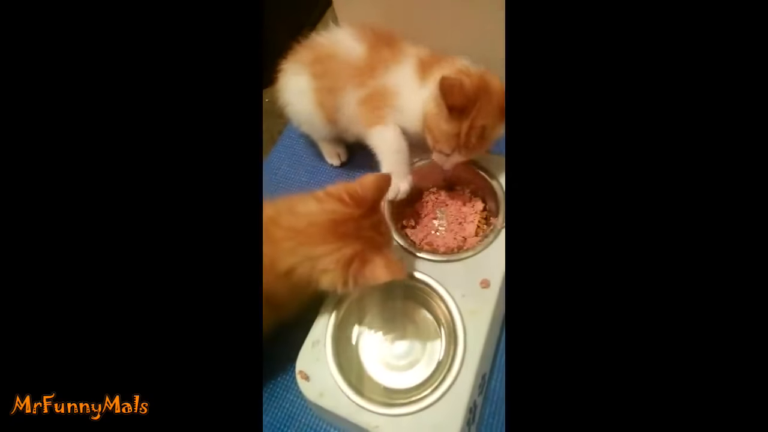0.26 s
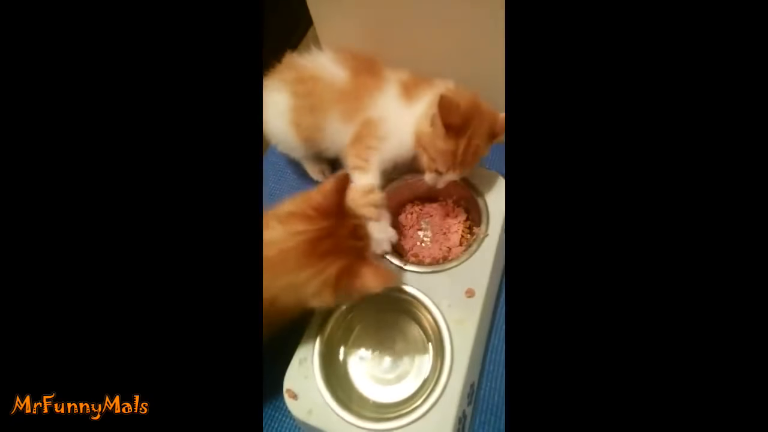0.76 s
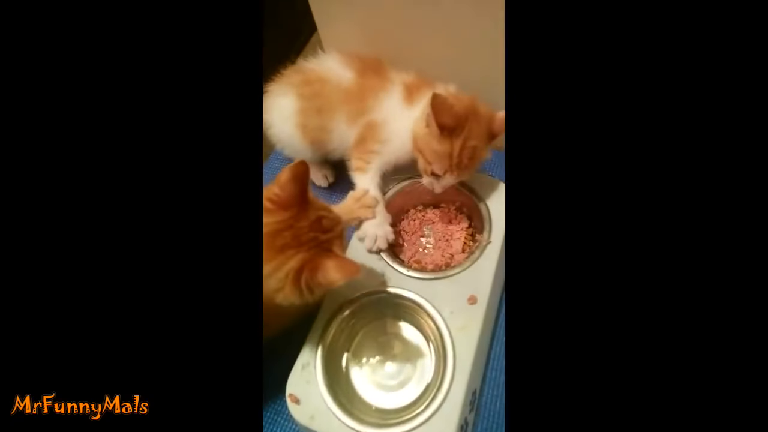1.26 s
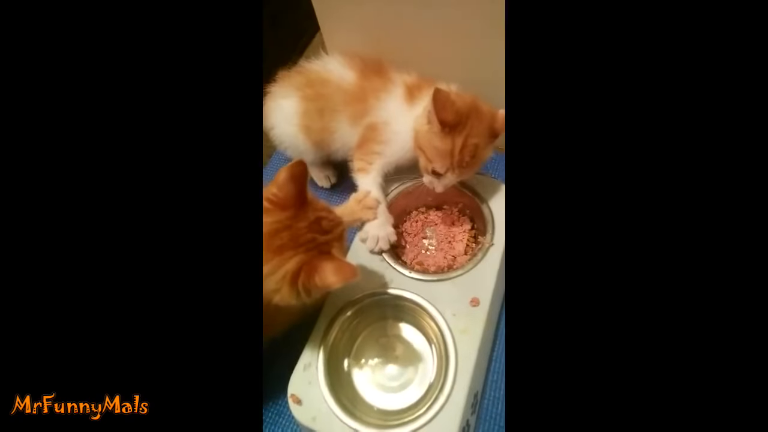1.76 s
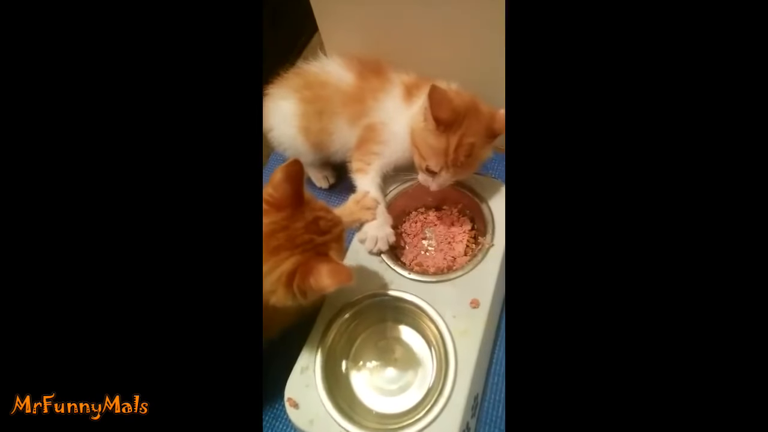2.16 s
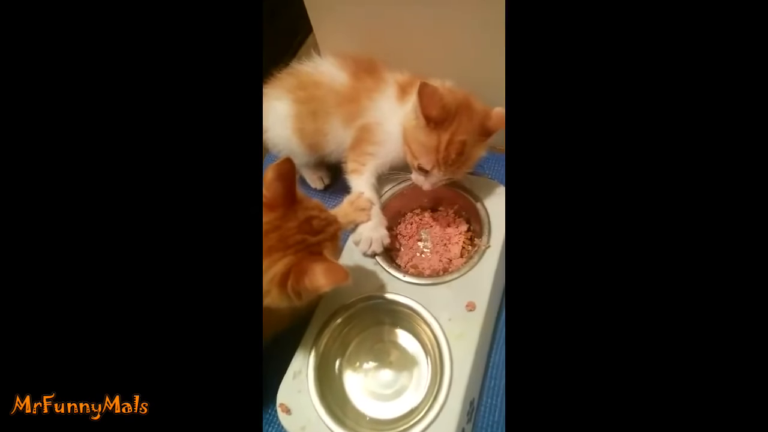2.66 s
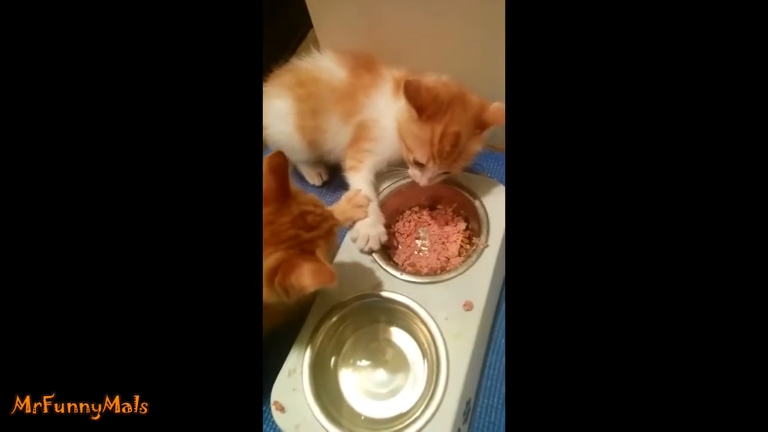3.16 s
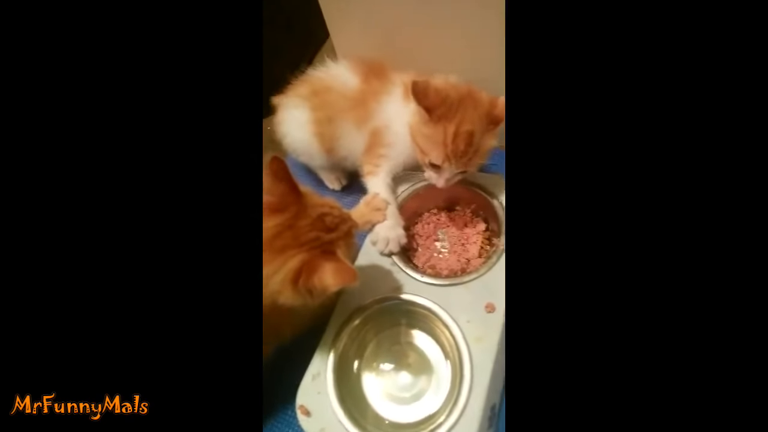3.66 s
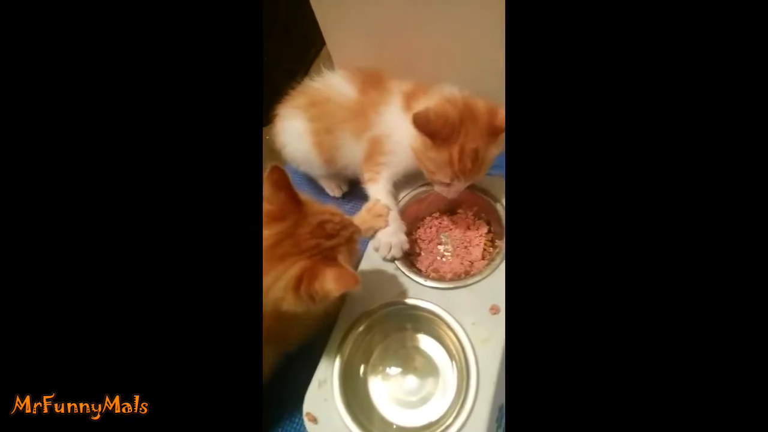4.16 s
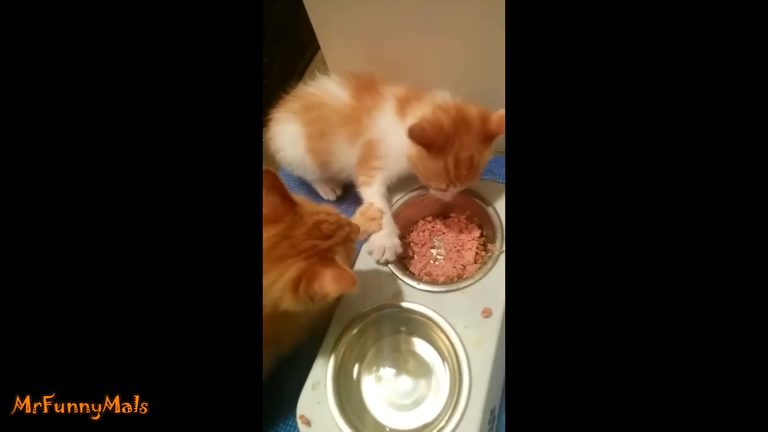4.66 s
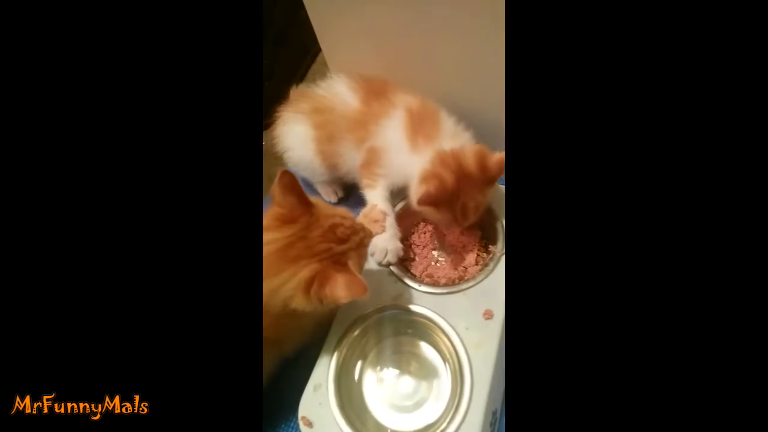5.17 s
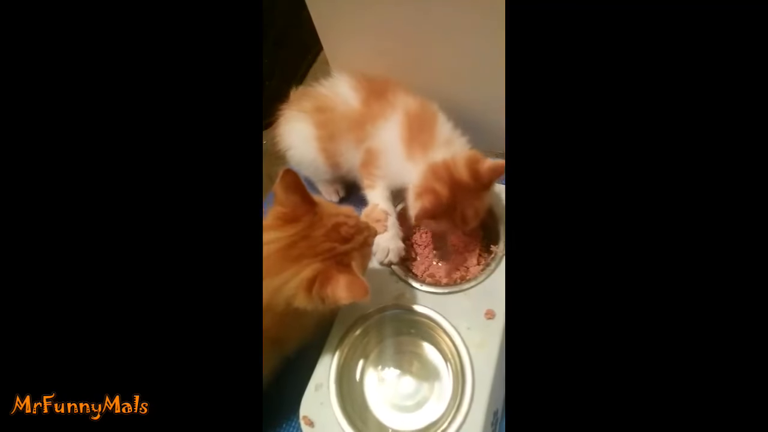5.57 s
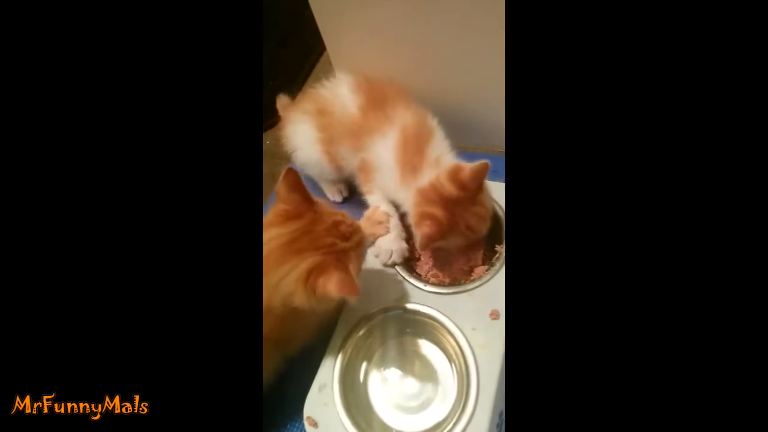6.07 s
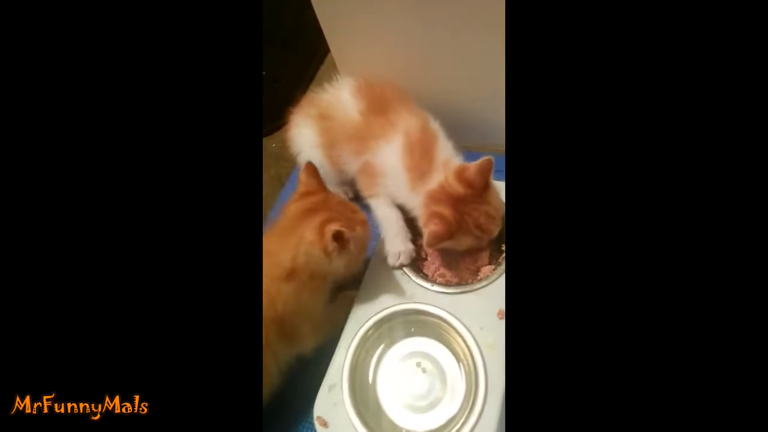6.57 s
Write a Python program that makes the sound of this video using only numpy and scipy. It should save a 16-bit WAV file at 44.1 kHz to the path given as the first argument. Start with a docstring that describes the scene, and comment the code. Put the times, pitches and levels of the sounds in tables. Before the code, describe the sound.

A small furnished room, close phone sound, with a faint low hum and uneven soft rustle of paws on a mat. A kitten's clear, high mew is already sounding and stops by 0.25 s; soft knocks and smacks at the bowl follow until 0.4. At 0.6 a rough yowl leaps upward with a dull thump and a spitty hiss, loud and open-mouthed, a thin whistle riding over it. It slides slowly down, dropping abruptly near 1.95 into a muffled moan lasting to 2.9. From 2.0 a second kitten moans lower, beating against it, and breaks into a growl by 3.25. Only faint knocks fill the gap until 4.0. Then the first growls, climbing to a strained, raspy wail around 5.0 to 5.8; the second snarls at 4.5 and wails until 5.2. The wail cracks and sinks by 6.05. Faint taps, then a wavering whine from 6.4 to 6.8.

```python
"""Two kittens quarrel over a food bowl in a small room; knocks and smacks come and go over rustling and a low hum.
One mews, then yowls with a thin whistle on top and sinks to a moan, while a second voice begins a moan of its own.
After a gap with only faint knocks the first growls its way up into a wail, against a snarl and a wail from
the second, and ends on a whine. Voices are stacks of unsteady harmonics shaped by an opening mouth, plus noisy
breath; knocks are short bursts of noise that ring a damped resonance; the background is shaped noise and sines."""
import sys
import numpy as np
from scipy import signal
from scipy.fft import rfft, irfft, next_fast_len
from scipy.io import wavfile

SR = 44100
rng = np.random.default_rng(int(sys.argv[2]) if len(sys.argv) > 2 else 0)


def wav_record(signal):
    """Record a signal, one row per channel, as 16-bit PCM in the file named by sys.argv[1]."""
    frames = np.transpose(np.atleast_2d(signal))
    bounded = np.clip(frames, -1, 1)
    # unit amplitude maps onto the largest positive 16-bit level
    quanta = np.round(bounded * 32767).astype(np.int16)
    wavfile.write(sys.argv[1], SR, quanta)


N = 300321
TIME = np.arange(N) / SR  # s
TOP_HZ = 15700  # nothing much is left above this

# The long yowl and the later wail, point by point, each before its gain and wavering:
# (t/s, pitch f/Hz, level/dB, mouth opening 0-1, roughness 0-1)
YOWL = [(0.592, 279, -33.5, 0.14, 0.52), (0.62, 485, -24.5, 0.11, 0.7), (0.642, 546, -19, 0.35, 0.96),
        (0.653, 548.4, -12, 0.5, 0.7), (0.68, 768, -16.5, 0.87, 0.63), (0.736, 1006, -9.5, 0.94, 0.52),
        (0.765, 1062, -12, 1.0, 0.23), (0.83, 1055, -14, 1.0, 0.23), (0.9, 1033, -14, 0.87, 0.04),
        (0.992, 1072, -15, 0.9, 0.054), (1.03, 1053, -12.5, 0.88, 0.043), (1.088, 1028, -15, 0.85, 0.05),
        (1.115, 997, -19, 0.91, 0.07), (1.17, 1002, -20, 0.81, 0.13), (1.28, 978, -19, 0.78, 0.098),
        (1.42, 948.4, -18.5, 0.74, 0.07), (1.46, 982, -19, 0.83, 0.2), (1.52, 958, -15, 0.71, 0.04),
        (1.6, 949.4, -16.5, 0.74, 0.065), (1.83, 908, -15, 0.72, 0.053), (1.89, 884, -16, 0.7, 0.091),
        (1.93, 828.6, -11.5, 0.646, 0.13), (1.955, 822, -28.5, 0.52, 0.27), (2.03, 774, -26, 0.45, 0.09),
        (2.1, 667.6, -29.5, 0.43, 0.12), (2.18, 625.6, -23.5, 0.38, 0.061), (2.4, 604, -22.5, 0.32, 0.07),
        (2.435, 539.6, -17, 0.24, 0.083), (2.58, 523.2, -14.5, 0.21, 0.057), (2.78, 576.2, -23, 0.31, 0.32),
        (2.845, 538, -25.5, 0.31, 0.25), (2.88, 486, -32, 0.43, 0.29)]
WAIL = [(4.015, 200.6, -54, 0.13, 0.4), (4.04, 202.2, -40.5, 0.14, 0.64), (4.17, 210.8, -31.5, 0.094, 0.25),
        (4.24, 252.6, -35.5, 0.18, 0.7), (4.33, 296.8, -36, 0.18, 0.7), (4.365, 398.4, -29.5, 0.2, 0.45),
        (4.44, 457, -34.5, 0.33, 0.41), (4.495, 394.4, -30.5, 0.38, 0.61), (4.61, 446, -37, 0.54, 0.5),
        (4.66, 445.3, -35.5, 0.4, 0.19), (4.745, 432, -23.5, 0.37, 0.11), (4.8, 402, -26.5, 0.38, 0.19),
        (4.86, 429, -30, 0.37, 0.56), (4.97, 572.4, -26.5, 0.65, 0.13), (5.11, 548.6, -20, 0.74, 0.09),
        (5.17, 536, -25, 0.73, 0.12), (5.27, 574.7, -23.5, 0.71, 0.12), (5.38, 586, -24.5, 0.76, 0.13),
        (5.46, 564.6, -17.5, 0.75, 0.15), (5.523, 544, -16.5, 0.764, 0.094),
        (5.531, 491, -14.5, 0.67, 0.17), (5.59, 499.3, -21, 0.68, 0.14), (5.7, 532.2, -22.5, 0.68, 0.15),
        (5.765, 515.7, -19, 0.71, 0.051), (5.81, 415, -21.5, 0.57, 0.734), (5.845, 421.4, -24.5, 0.5, 0.82),
        (5.9, 287.5, -23.5, 0.27, 0.37), (6.01, 324.6, -29.5, 0.031, 0.56), (6.042, 257.6, -33, 0.1, 0.64),
        (6.065, 265.7, -46.5, 0.046, 0.8)]
# Colour of a raspy throat, before scaling: (f/Hz, level/dB)
RASP = [(1500, -15), (3000, -4), (4200, -0.5), (4800, -10), (5500, -19.5), (6800, 5), (8400, -3.5),
        (9400, -15), (12000, -25.5), (16000, -47.5)]
# Colour of a thin, very high hiss, before scaling: (f/Hz, level/dB)
SIZZLE = [(7000, -22), (8800, 2.5), (10000, 1), (10900, -7.5), (12100, -8), (13200, -16.5), (14700, -13.5),
          (16000, -18.5)]


def undb(db):
    """Turn decibels into a gain."""
    return 10 ** (np.asarray(db) / 20)


def unit(x):
    """Scale a signal to an average (rms) strength of 1."""
    return x / np.sqrt(np.mean(x ** 2))


def curves(rows, t):
    """Draw straight lines between the rows of a table and read every column at the times t."""
    s, *columns = np.transpose(rows)
    return [np.interp(t, s, c) for c in columns]


def span(rows, fade_s=.008):
    """Find the samples that a table covers, their times, and a gate with soft edges."""
    start, end = rows[0][0], rows[-1][0]
    at = np.flatnonzero((TIME > start - fade_s) & (TIME < end + fade_s))
    t = TIME[at]
    gate = np.clip(np.minimum(t - start, end - t) / fade_s + 1, 0, 1)
    return at, t, gate


def colour(points, hz):
    """Read a spectrum in dB at hz, with straight lines over log frequency."""
    f, db = np.transpose(points)
    return np.interp(np.log(np.maximum(hz, 1)), np.log(f), db)


def noise(points):
    """Make noise of rms 1 with the given spectrum."""
    hz = np.arange(N // 2 + 1) * SR / N
    spectrum = rfft(rng.standard_normal(N)) * undb(colour(points, hz))
    return unit(irfft(spectrum, N))


def flutter(hz, n):
    """Wander at random with a spread of 1, hardly faster than hz."""
    size = next_fast_len(n + SR)
    f = np.arange(size // 2 + 1) * SR / size
    spectrum = rfft(rng.standard_normal(size)) / (1 + (f / hz) ** 4)
    return unit(irfft(spectrum, size))[:n]


def burst(start, length, attack_s, release_s, depth_db=30):
    """Rise, hold and fall along straight lines in dB; each slope takes its time to cover depth_db."""
    before = (start - TIME) / attack_s
    after = (TIME - start - length) / release_s
    return -depth_db * np.maximum(0, np.maximum(before, after))


def background(hum_db=-4, rustle_db=-1):
    """Room tone and a hum that swell along with the low, uneven rustle of paws on a mat."""
    # Paws shifting, before the rustle is trimmed and made uneven: (t/s, level/dB)
    paw_shifts = [(0.13, -41), (0.399, -43), (0.72, -39), (1.06, -44.5), (1.38, -47.5), (1.99, -43),
                  (2.29, -39.5), (3.0, -46.5), (3.199, -47.5), (3.811, -55), (4.1, -48.5), (5.18, -47),
                  (5.52, -45), (5.75, -46.5), (6.051, -47.5), (6.55, -49), (6.8, -46)]
    # Colour of the quiet room, before scaling: (f/Hz, level/dB)
    room_colour = [(30, -23.5), (60, -2), (120, 4), (250, 0.5), (500, 7.5), (800, -6), (1200, -10),
                   (2000, -20.5), (4000, -24.5), (8000, -35), (15000, -48)]
    # Steady low tones, before hum_db and the swell: (f/Hz, level/dB)
    hum_tones = [(118.4, -55.5), (236.9, -61.5)]
    rise_db_per_s, fall_db_per_s, still_db = 108, 88, -57.5
    shifts = []
    for s, db in paw_shifts:
        slope_db = np.maximum((s - TIME) * rise_db_per_s, (TIME - s) * fall_db_per_s)
        shifts.append(db - slope_db)
    low_db = np.maximum(np.max(shifts, axis=0), still_db)
    swell = undb(0.75 * (low_db - np.median(low_db)) + 2 * flutter(23.0, N))

    tone = noise(room_colour) * undb(-58.5)
    hum = sum(undb(db + hum_db) * np.sqrt(2) * np.sin(2 * np.pi * hz * TIME) for hz, db in hum_tones)
    uneven_hum = hum * undb(3.8 * flutter(9.2, N))
    rustle = noise([(35, -31.5), (80, -6.5), (135, 5.0), (300, -5.0), (700, -8.5), (2000, -53.5)])
    uneven_rustle = rustle * undb(low_db + rustle_db + 5.1 * flutter(13, N))
    return swell * (tone + uneven_hum) + uneven_rustle


def knocks(rise_s=.003):
    """Knocks and smacks at the bowl: soft contacts, each ringing one broad, quickly damped resonance."""
    # One row per contact; t60 is the time its noise takes to fade by 60 dB:
    # (t/s, level/dB, centre f/Hz, filter width/Hz, t60/s)
    contacts = [(0.221, -27.5, 860, 1310, 0.12), (0.223, -33.5, 8400, 5970, 0.062),
                (0.368, -28, 1190, 630, 0.098), (0.382, -33.5, 1310, 910, 0.079),
                (0.386, -47, 5060, 5040, 0.086), (0.398, -38, 228, 203, 0.15),
                (0.572, -41, 690, 700, 0.068), (0.644, -16, 330, 303, 0.066),
                (.808, -32, 8000, 5000, 0.033), (0.81, -41, 248.5, 408, 0.1178),
                (3.467, -62.5, 9070, 2467, 0.13), (3.495, -54.5, 231.4, 200, 0.12),
                (3.602, -53, 231.4, 200, 0.092), (3.627, -56, 403, 407, 0.23),
                (3.688, -51.5, 345, 295, 0.081), (3.792, -42, 986, 578, 0.081),
                (3.889, -45, 826, 452, 0.066), (4.301, -48, 2800, 600, 0.05), (6.11, -66, 707, 678, .1),
                (6.29, -57, 600, 622, 0.081), (6.32, -55, 985, 884, 0.077), (6.528, -51, 6190, 903, 0.48)]
    out = np.zeros(N)
    t = TIME[:SR // 2]
    for s, db, hz, width, t60 in contacts:
        b, a = signal.iirpeak(hz, hz / width, fs=SR)
        body = signal.tf2sos(b, a).repeat(2, axis=0)  # the same resonance twice in a row
        scuff = rng.standard_normal(len(t))
        contact = (1 - np.exp(-t / rise_s)) * np.exp(-np.log(1000) * t / t60)
        steady_level = np.std(signal.sosfilt(body, scuff))
        hit = undb(db) * signal.sosfilt(body, scuff * contact) / steady_level
        i = int(s * SR)
        out[i:i + len(t)] += hit[:N - i]
    return out


def air(bursts, spectrum, attack_s, release_s, grain=0.23):
    """Bursts of harsh air from the mouth: coloured noise with a fine, random grain."""
    gains = [undb(db + burst(start, length, attack_s, release_s)) for start, length, db in bursts]
    return np.max(gains, axis=0) * noise(spectrum) * (1 + grain * flutter(120, N))


def spit():
    """Air forced through the bared teeth, as short bursts of coloured noise."""
    # When the air is forced out: (t/s, length/s, level/dB)
    spit_bursts = [(0.68, 0.18, -48), (4.49, .14, -44), (4.775, 0.098, -42.5), (5.755, 0.1, -46.5)]
    # Colour of air between teeth, before scaling: (f/Hz, level/dB)
    teeth_colour = [(300, -17), (1000, 3), (1700, -10.5), (2300, -5), (3100, 10), (3700, -23.5),
                    (5000, -29.5), (9000, -35), (15000, -61.5)]
    return air(spit_bursts, teeth_colour, attack_s=0.056, release_s=.09)


def throat_rasp():
    """The throat rasps now and then during the wail, as short bursts of raspy noise."""
    # When the throat rasps: (t/s, length/s, level/dB)
    rasp_bursts = [(4.49, 0.16, -58.5), (4.78, .1, -51.5), (5.12, 0.099, -41.5), (5.5, 0.089, -50)]
    return air(rasp_bursts, RASP, attack_s=0.058, release_s=0.15, grain=0.22)


def jaw_hiss():
    """Thin hiss from the mouth, as bursts of very high noise."""
    # When the jaw hisses: (t/s, length/s, level/dB)
    hiss_bursts = [(0.0, 0.044, -50), (0.645, 0.072, -43.5), (0.745, 0.065, -35.5), (5.03, 0.26, -53.5),
                   (5.4, .19, -56.5)]
    return air(hiss_bursts, SIZZLE, attack_s=.03, release_s=0.14)


def whistle(waver=.0012, wander_db=3.5, hiss_db=-17):
    """A very high oscillation in the tight throat; the vocal folds chop it into side tones, and its jet hisses."""
    # Side tones around the whistle: (distance in multiples of the voice pitch, level/dB relative to the whistle)
    side_tones = [(-2, -20), (-1, -9), (0, 0), (1, -8.5), (2, -26)]
    pitch = curves(YOWL, TIME)[0]
    hz = (7834 + 1.7 * pitch) * (1 + waver * flutter(90, N))  # rises and falls with the yowl
    db = -41.5 + burst(.8, 1.05, attack_s=.03, release_s=0.054) + wander_db * flutter(15, N)
    tones = np.zeros(N)
    for k, side_db in side_tones:
        phase = 2 * np.pi * np.cumsum(hz + round(k) * pitch) / SR
        tones += undb(side_db) * np.sin(phase)
    return undb(db) * (tones + undb(hiss_db) * noise(SIZZLE))


def strained_overtones(gain_db=-27, air_db=-9, wide_open=0.72, shut_db=-80):
    """With the mouth wide open in the wail, the upper throat resonance picks out a few unsteady overtones."""
    # Resonance of the upper throat, before scaling: (f/Hz, level/dB)
    throat_colour = [(3300, -17), (3950, 13), (4500, 10.5), (4900, -29.5), (5400, -31), (7000, -42.5)]
    at, t, gate = span(WAIL)
    n = len(t)
    pitch, level_db, opening, _ = curves(WAIL, t)
    phase = 2 * np.pi * np.cumsum(pitch * (1 + 0.00906 * flutter(42.3, n))) / SR
    ring = np.zeros(n)
    for k in range(6, 15):
        ring += undb(colour(throat_colour, k * pitch)) * np.sin(k * phase + 0.75 * flutter(100, n))
    # the level drops as the mouth closes below wide_open
    db = level_db + gain_db + shut_db * np.maximum(wide_open - opening, 0)
    out = np.zeros(N)
    out[at] = gate * undb(db) * (unit(ring) + undb(air_db) * noise(throat_colour)[at])
    return out


def mouth(pitch, opening, peak_db, fall_shut_db, fall_open_db, nasal_db, thin_db, count=5):
    """Share out the low harmonics in dB: one mouth resonance climbs as the jaw opens, with a slope above it."""
    shut_hz, range_octaves, width_octaves = 600, 2.482, 0.27
    # the fall above the resonance changes from its shut to its open value between these openings
    lips_shut, lips_clear = 0.49, .7
    k = np.arange(1, count + 1)[:, None]
    octaves = np.log2(k * pitch / shut_hz) - range_octaves * opening  # distance from the resonance
    db = peak_db / (1 + (octaves / width_octaves) ** 2)
    db += nasal_db * (1 - opening) * (k == 1)  # the fundamental through the nose
    db -= np.interp(opening, (lips_shut, lips_clear), (fall_shut_db, fall_open_db)) * np.maximum(octaves, 0)
    db += thin_db * opening * np.minimum(octaves, 0)  # the opening also tilts the part below the resonance
    return db - 10 * np.log10(np.sum(undb(db) ** 2, axis=0))  # the shares of power add up to one


def voice(rows, gain_db, peak_db, fall_shut_db, fall_open_db, nasal_db, thin_db,
          bright_db, overtone_db, edge_db, rasp_db, air_db,
          open_db=35, rough_db=30, wander_db=2.0, waver=0.0075, count=26):
    """One call: harmonics of unsteady vocal folds shaped by the mouth, with air rasping once a cycle."""
    # Colour of the overtones above the lowest five, before scaling: (f/Hz, level/dB)
    overtone_colour = [(1000, 11.5), (1600, 2), (2800, -2), (3300, -28.5), (4000, -24.5), (4600, -27.5),
                       (5500, -44.5), (7000, -73.5), (11000, -100)]
    at, t, gate = span(rows)
    n = len(t)
    pitch, level_db, opening, rough = curves(rows, t)
    rough = np.clip(rough, 0, 1)
    mouth_db = mouth(pitch, opening, peak_db, fall_shut_db, fall_open_db, nasal_db, thin_db)
    harmonic_db = level_db + gain_db + mouth_db
    # an open mouth and rough folds add treble
    treble_db = level_db + bright_db + open_db * opening + rough_db * rough

    # slack folds lurch in pitch, and every cycle has its own length and strength
    slack = rough * np.minimum(1, 330 / pitch)
    jitter = .055 * slack * flutter(45, n) + .03 * rough * flutter(170, n)
    phase = 2 * np.pi * np.cumsum(pitch * (1 + jitter + waver * flutter(38, n))) / SR
    strength = 1 + 0.21 * slack * flutter(140, n)

    lead = len(harmonic_db)  # how many low harmonics the mouth shapes one by one
    # the overtones carry on from the last of these
    head_db = harmonic_db[-1] + overtone_db - colour(overtone_colour, lead * pitch)
    # the sharp closure of the folds spreads its power over the high harmonics
    closure_db = treble_db + edge_db + 10 * np.log10(pitch / 1000)
    tone = np.zeros(n)
    for k in range(1, count + 1):
        hz, shake, blur = k * pitch, flutter(70, n), 0
        if k <= lead:
            # the shape of a cycle changes too, so each harmonic wanders and shakes on its own
            size = undb(harmonic_db[k - 1] + wander_db * flutter(16, n)) * (1 + 0.94 * slack * shake)
        else:
            # the overtones lose their lock on the cycle and smear into bands
            blur = 8 * rough * shake
            overtone = undb(head_db + colour(overtone_colour, hz))
            edge = undb(closure_db + colour(RASP, hz))
            size = (overtone + edge) * undb(2 * shake)
        tone += size * (hz < TOP_HZ) * np.sin(k * phase + blur + rng.uniform(0, 2 * np.pi))

    # turbulence in the airflow fills the valleys between the harmonics
    turbulence = (undb(air_db) + 0.32 * rough) * flutter(450, n)
    puffs = strength * (1 + 0.75 * np.cos(phase))  # one puff of air a cycle
    rasp = undb(treble_db + rasp_db) * noise(RASP)[at] * puffs
    out = np.zeros(N)
    out[at] = gate * (tone * (strength + turbulence) + rasp)
    return out


def second_voice():
    """Calls that cross the first voice and beat against it: a moan that ends in a growl, a snarl, a rising wail."""
    # Each call, before its gain and wavering: (t/s, pitch f/Hz, level/dB, mouth opening 0-1, roughness 0-1)
    moan_rows = [(2.02, 229.7, -36, 0.033, 0.43), (2.1, 218.8, -30.5, 0.05, 0.49),
                 (2.26, 311.3, -31, 0.27, 0.28), (2.32, 379.2, -31, 0.3, 0.37), (2.5, 431, -27, 0.2, 0.98),
                 (2.64, 469, -34.5, 0.12, 0.21), (2.7, 548.4, -20, 0.21, 0.13),
                 (2.85, 487, -31, 0.32, 0.12), (2.95, 505, -34.5, 0.4, 0.15),
                 (2.98, 374.7, -26.5, 0.24, 0.53), (3.08, 252, -26, 0.2, 0.55),
                 (3.17, 276, -31.5, 0.24, 0.8), (3.22, 234.3, -33.5, 0.2, 0.98),
                 (3.27, 216, -46.5, 0.18, 0.78)]
    snarl_rows = [(4.487, 407.5, -28.5, 0.13, 0.6), (4.535, 325.0, -36.5, 0.34, 1),
                  (4.58, 299.5, -32.5, 0.17, 0.58), (4.645, 328.5, -36.5, 0.4, 0.76)]
    wail_rows = [(4.71, 368, -44.1, 0.22, 1), (4.735, 407, -30.5, 0.3, 0.5), (4.79, 505, -28, 0.46, 0.1),
                 (4.85, 517.7, -25, 0.47, 0.17), (4.98, 627.6, -29.5, 0.47, 0.46),
                 (5.11, 585.0, -29, 0.42, 0.32), (5.18, 561, -39, 0.56, 1)]
    moan = voice(moan_rows, gain_db=1.0, peak_db=10.5, fall_shut_db=29, fall_open_db=47, nasal_db=3.3, thin_db=10.2,
                 bright_db=-72, overtone_db=-12.0, edge_db=-14.5, rasp_db=-6, air_db=-26.0)
    snarl = voice(snarl_rows, gain_db=4, peak_db=14.5, fall_shut_db=-1.5, fall_open_db=6, nasal_db=9, thin_db=9.0,
                  bright_db=-76, overtone_db=-6.5, edge_db=-15.5, rasp_db=8, air_db=-30.0)
    wail = voice(wail_rows, gain_db=6.5, peak_db=12, fall_shut_db=29, fall_open_db=12, nasal_db=18, thin_db=-5.0,
                 bright_db=-76, overtone_db=-9.5, edge_db=-11.0, rasp_db=1, air_db=-47.0)
    return moan + snarl + wail


def guarding_kitten():
    """A mew, a long yowl that falls to a moan, a growl that climbs to a wail, cracks and sinks back, a last whine."""
    # Each call, before its gain and wavering: (t/s, pitch f/Hz, level/dB, mouth opening 0-1, roughness 0-1)
    mew_rows = [(0.0, 716, -17.5, 0.67, 0.1), (0.06, 718.5, -13, 0.67, 0.02),
                (0.134, 694.4, -12, 0.67, 0.06), (0.18, 723, -16, 0.64, 0.06),
                (0.218, 694, -16, 0.67, 0.25), (0.235, 660, -36, 0.38, 0.4)]
    whine_rows = [(6.398, 315, -38.5, 0.18, 0.3), (6.412, 386, -35.5, 0.26, 0.3),
                  (6.45, 499, -20, 0.27, 0.24), (6.5, 551, -18.5, 0.27, 0.17),
                  (6.53, 546, -19.5, 0.41, 0.34), (6.614, 425.7, -33.5, 0.34, 0.31),
                  (6.7, 556, -16.5, 0.41, 0.19), (6.758, 591, -30, 0.37, 0.12),
                  (6.8, 559, -21.5, 0.36, 0.15)]
    mew = voice(mew_rows, gain_db=2, peak_db=22.5, fall_shut_db=45.5, fall_open_db=29, nasal_db=-33, thin_db=2.5,
                bright_db=-66, overtone_db=-18.5, edge_db=-12.5, rasp_db=-6, air_db=-46.5, waver=0.0057)
    yowl = voice(YOWL, gain_db=4, peak_db=12, fall_shut_db=48, fall_open_db=16, nasal_db=2.5, thin_db=2.2,
                 bright_db=-67.5, overtone_db=5.5, edge_db=-8.5, rasp_db=-9, air_db=-40.5, waver=0.0051)
    wail = voice(WAIL, gain_db=2.5, peak_db=7.5, fall_shut_db=24.5, fall_open_db=27.5, nasal_db=3, thin_db=15.5,
                 bright_db=-46.5, open_db=21, rough_db=5.5, overtone_db=-10, edge_db=-5, rasp_db=-6.0, air_db=-41)
    whine = voice(whine_rows, gain_db=4, peak_db=19.5, fall_shut_db=23.5, fall_open_db=20, nasal_db=25, thin_db=8.3,
                  bright_db=-57.5, overtone_db=0, edge_db=-13, rasp_db=-13.5, air_db=-53)
    return mew + yowl + wail + whine


def room(x, t60_s=.22, wet_db=-18, dull_hz=5000, gap_s=0.00073):
    """A small furnished room: a short, dull tail of fading noise after the direct sound."""
    t = TIME[:SR // 2]
    tail = rng.standard_normal(len(t)) * np.exp(-np.log(1000) * t / t60_s) * (t > gap_s)
    b, a = signal.butter(1, dull_hz, fs=SR)
    tail = signal.lfilter(b, a, tail / np.linalg.norm(tail))
    return x + undb(wet_db) * signal.fftconvolve(x, tail)[:N]


def scene():
    """Both kittens and the bowl in the room, over the background."""
    breath = spit() + throat_rasp() + jaw_hiss()
    kittens = guarding_kitten() + second_voice() + whistle() + strained_overtones() + breath
    return (room(kittens + knocks()) + background())[None]


def record(dry):
    """The phone rounds the very loudest peaks and cuts the top."""
    rounded = dry / (1 + (dry / .68) ** 8) ** (1 / 8)
    low_pass = signal.ellip(10, .2, 80, TOP_HZ, fs=SR, output="sos")
    return signal.sosfilt(low_pass, rounded)


dry = scene()
out = record(dry)
wav_record(out)
```